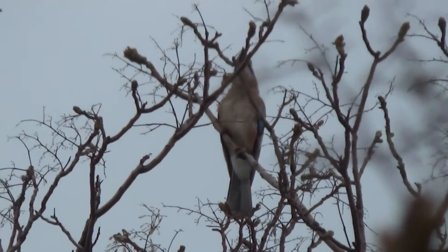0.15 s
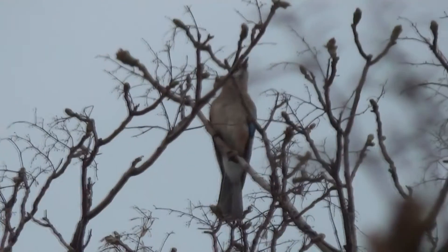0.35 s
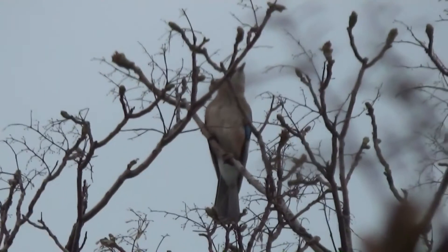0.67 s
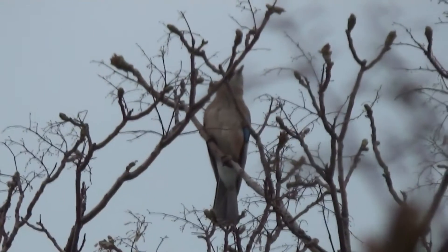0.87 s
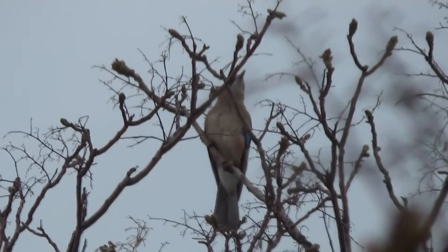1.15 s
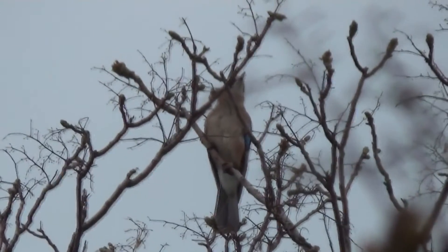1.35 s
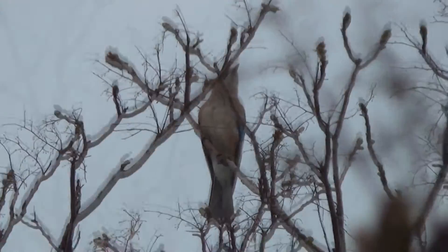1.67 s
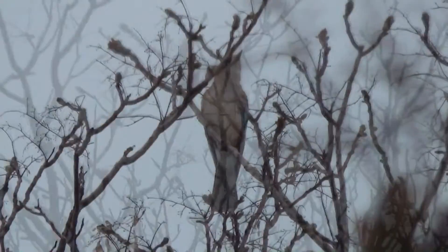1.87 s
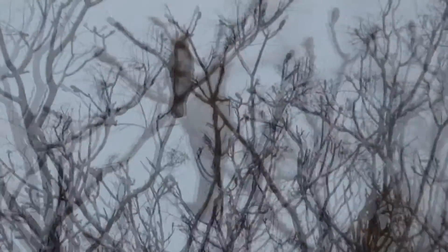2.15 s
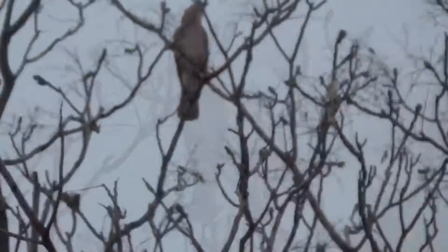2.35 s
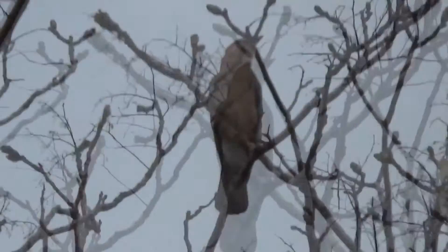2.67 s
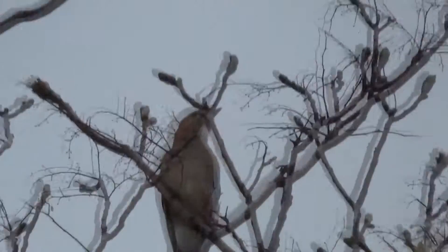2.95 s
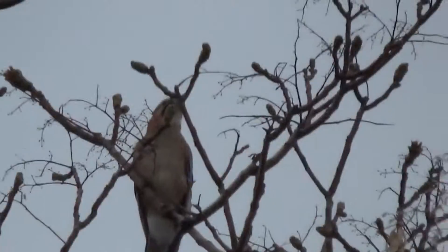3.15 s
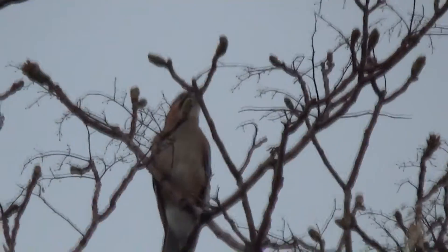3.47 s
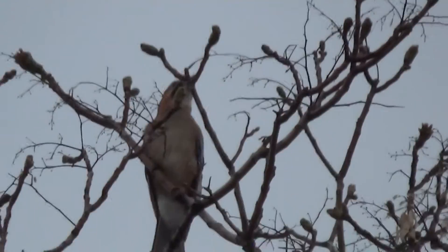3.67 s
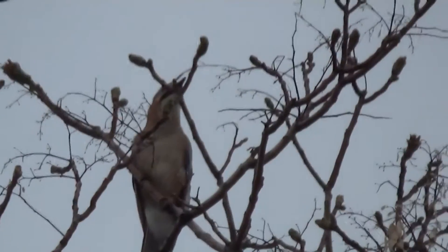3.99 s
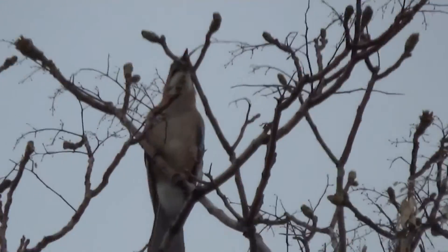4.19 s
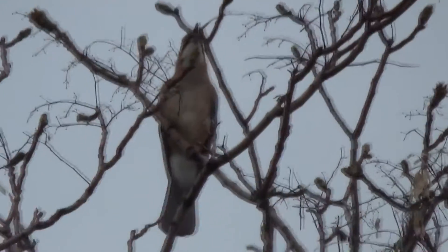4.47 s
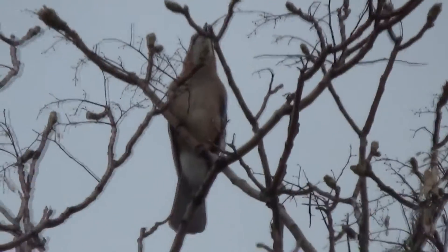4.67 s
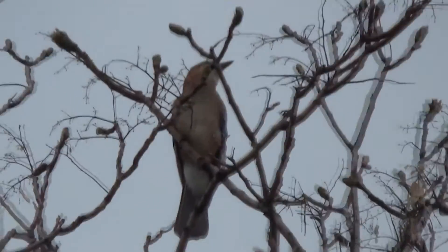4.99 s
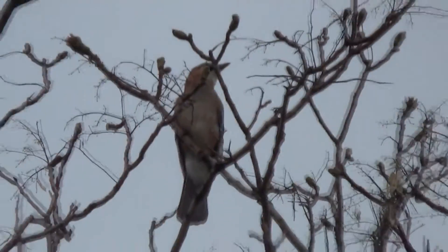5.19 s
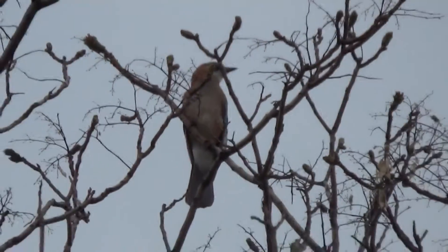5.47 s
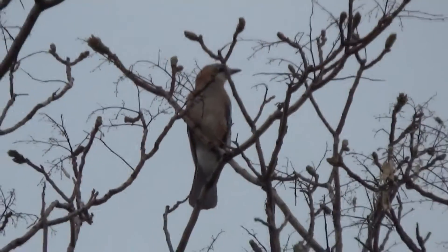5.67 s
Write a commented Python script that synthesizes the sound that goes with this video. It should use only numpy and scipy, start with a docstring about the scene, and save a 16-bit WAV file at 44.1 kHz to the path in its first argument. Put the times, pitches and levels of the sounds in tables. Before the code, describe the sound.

A jay's harsh screech is cut off, a car rolls away, small clicks follow, then a short rasp and another long raucous screech outdoors.

```python
"""Jay in a bare treetop

A jay screeches: the end of one call, then a short rasp and a long screech; each is pulses and puffs of
a fluttering syrinx, rung by throat resonances and echoed by trees. A car rolls away on a near road and
far traffic hums, both as shaped noise, the traffic with wavering tones. The camera ticks in the hands:
noise bursts ring its shell. Small birds chirp far off as gliding, warbling sines.
"""
import sys
import numpy as np
from scipy import signal
from scipy.fft import rfft, irfft
from scipy.io import wavfile
from scipy.ndimage import uniform_filter1d

SR = 44100
rng = np.random.default_rng(int(sys.argv[2]) if len(sys.argv) > 2 else 0)


def unload_audio(sound):
    """Save the sound as a 16-bit wav file, at the path given as the first command line argument."""
    columns = np.transpose(np.atleast_2d(sound))
    # keep every value between -1 and 1, then stretch to whole-number steps
    steps = np.round(np.clip(columns, -1, 1) * 32767)
    wavfile.write(sys.argv[1], SR, steps.astype(np.int16))


N = 257544
FFT_SIZE, HOP = 1024, 256
BIN_HZ = np.fft.rfftfreq(FFT_SIZE, 1 / SR)[:, None]
FRAME_S = np.arange(N // HOP + 5) * HOP / SR


def gain_of(db):
    """Decibels to amplitude gain."""
    return 10 ** (np.asarray(db) / 20)


def evened(x):
    """Scales to rms 1."""
    return x / np.sqrt(np.mean(x ** 2) + 1e-20)


def smooth_noise(count, size):
    """Slow random curve of rms 1: white noise under a moving average."""
    return evened(uniform_filter1d(rng.standard_normal(count), size=size))


def read(points, hz):
    """Spectrum table interpolated over log frequency."""
    table_hz, value = np.transpose(points)
    return np.interp(np.log(hz + 1), np.log(table_hz + 1), value)


def add(mix, start_s, sound):
    """Mixes a sound in at its start time."""
    part = mix[round(start_s * SR):][:len(sound)]
    part += sound[:len(part)]


def resonate(x, hz, width_hz):
    """Steep resonance of gain 1: shifts the curve hz to zero, smooths twice, shifts back."""
    turn = np.exp(2j * np.pi * np.cumsum(hz * np.ones(len(x))) / SR)
    r = np.exp(-np.pi * width_hz / SR)
    smoothed = signal.lfilter([(1 - r) ** 2], [1, -2 * r, r * r], x / turn)
    return 2 * (turn * smoothed).real


def unit(colour_db):
    """Shifts each spectrum so that its total power is 0 dB."""
    return colour_db - 10 * np.log10((gain_of(colour_db) ** 2).sum(0))


def above(corner_hz):
    """Treble weight: 0 below the corner, 1 from about an octave above."""
    return np.clip(np.log2(BIN_HZ / corner_hz + .01), 0, 1)


# background width: (frequency [Hz], side minus mid [dB])
SIDE_DB = [(60, -20), (240, -32.5), (950, -34.5), (3770, -33), (15000, -32)]


def hiss(field_db, patchy_db):
    """Near-mono noise from a frequency x time level field, with random patches."""
    mid_a, mid_b, side_a, side_b, patches = rng.standard_normal((5, *field_db.shape))
    patches = evened(uniform_filter1d(uniform_filter1d(patches, 10, 0), 12, 1))
    mid = mid_a + 1j * mid_b
    side = (side_a + 1j * side_b) * gain_of(read(SIDE_DB, BIN_HZ))
    z = np.array([mid + side, mid - side]) * gain_of(field_db + patchy_db * patches)
    return signal.istft(z, nperseg=FFT_SIZE, noverlap=FFT_SIZE - HOP)[1][:, :N] / np.sqrt(8 / 3)  # window loss


def waver(hz, share):
    """Tone of rms near 1 whose pitch and level drift a little."""
    pitch = smooth_noise(N, 6000)
    level = smooth_noise(N, 6000)
    tone = np.sin(2 * np.pi * np.cumsum(hz * (1 + share * pitch)) / SR)
    return np.sqrt(2) * (1 + .25 * level) * tone


RISE_DB, RISE_S, CUT_DB, CUT_S = -60, .028, -40, .019  # onset and cut-off: depths, time constants
PITCH_SHARE_PER_DB, ROUGH_PER_DB = .003, .025  # a weaker push is lower and rougher
BEAK_CLOSE_S = .12


def shape(start_s, end_s, top_db, fade_db, top_hz, droop, rough, gape):
    """Effort swells, sags and is cut off; pitch and roughness follow it while the beak settles from its gape."""
    t = np.arange(max(start_s, 0), end_s, 1 / SR)
    u = (t - start_s) / (end_s - start_s)
    push_db = RISE_DB * np.exp((start_s - t) / RISE_S) + CUT_DB * np.exp((t - end_s) / CUT_S)
    sag_db = fade_db * u ** 2
    hz = top_hz * (1 + PITCH_SHARE_PER_DB * push_db - droop * u ** 3)
    beak = 1 + gape * np.exp((start_s - t) / BEAK_CLOSE_S)
    return t, top_db + sag_db + push_db, hz, rough - ROUGH_PER_DB * (push_db + sag_db), beak


def flutter_beat(t, first_s, rate_start_hz, rate_end_hz):
    """Phase 0-1 of the syrinx flutter, its rate sweeping over the call."""
    since = t - first_s
    sweep = (rate_end_hz - rate_start_hz) * since / (2 * (t[-1] - first_s))
    return (since * (rate_start_hz + sweep)) % 1


THIN_BELOW_HZ, THINNING = 1500, .8  # low resonances lose THINNING dB more per dB of weaker push


def call(row, throat, flutter):
    """Membrane pulses and turbulent puffs, shaken by a flutter, ring the throat."""
    t, effort_db, hz, rough, beak = shape(*row)
    first_s, rate_start_hz, rate_end_hz, drop, dip_db = flutter
    beat = flutter_beat(t, first_s, rate_start_hz, rate_end_hz)
    depth = 1 + .3 * smooth_noise(len(t), 900)  # uneven beats
    slide = depth * uniform_filter1d(.5 - beat, size=250)  # pitch slides down, snaps back
    jitter = .028 * smooth_noise(len(t), 150)
    turns = np.cumsum(hz * (1 + drop * slide + jitter)) / SR

    spread = rng.normal(0, .2, 70)  # uneven closing spreads each pulse in time
    harmonics = range(2, int(15000 / hz.max()))
    pulses = evened(sum(np.cos(2 * np.pi * (k * turns + spread[k])) for k in harmonics))
    puffs = evened((.5 + np.exp(-(turns % 1) / .35)) * rng.standard_normal(len(t)))
    dip = gain_of(-dip_db * np.cos(np.pi * beat) ** 4 * depth)  # weakest at the snap
    thin_db = THINNING * (effort_db - effort_db.max())

    sound = 0
    for k, (f, width_hz, db) in enumerate(throat):
        noisy = np.clip(rough, .01, 1) ** (min(f + 2000, 3300) / f)  # lows stay clear, highs turn to noise
        source = (1 - noisy) * pulses + noisy * puffs
        drive = source * dip ** min(1, (1200 / f) ** 2)  # the low end throbs most
        ring = resonate(drive, f * beak, width_hz)
        sound = sound + (-1) ** k * gain_of(db + thin_db * (f < THIN_BELOW_HZ)) * ring
    return t[0], gain_of(effort_db) * evened(sound)


# calls: (start [s], end [s], effort [dB], fade over call [dB], pitch before sag [Hz], pitch droop [share],
#         roughness before sag [0-1], early gape [share])
JAY_CALLS = [(-.13, .287, -17, -12, 481, .03, .55, .03), (3.65, 3.853, -25.5, -5, 235, .1, .6, .01),
             (3.943, 4.362, -17.5, -6, 460, .12, .52, .12)]
# throat and beak resonances: (centre [Hz], width [Hz], level [dB])
FIRST_THROAT = [(950, 300, -27.5), (1325, 350, -13.5), (1966, 630, -8.5), (2395, 340, 3), (2870, 225, -6),
                (3340, 380, -12.5), (4450, 970, -10), (5490, 480, -2.5), (6080, 670, -4),
                (6760, 1700, -13.5), (9100, 1700, -16), (11100, 1400, -21.5), (13800, 3000, -32.5)]
RASP_THROAT = [(1480, 550, -13.5), (2655, 620, 0), (3470, 150, -8), (4020, 500, -1.5), (6130, 1400, -1.5),
               (7770, 1000, -17), (9440, 970, -5), (10870, 900, -17.5), (12300, 1100, -15)]
LONG_THROAT = [(860, 400, -29.5), (1330, 600, -16), (1857, 514, -2), (2295, 593, 1.5), (3015, 140, -9),
               (3480, 73, -14.5), (4560, 1870, -8), (5770, 890, -0.5), (7370, 3000, -15.5),
               (9900, 2100, -14.5), (11170, 1000, -20), (13500, 2600, -28)]
# syrinx flutter: (first beat [s], start rate [Hz], end rate [Hz], mean pitch drop [share], mean bass dip [dB])
FIRST_FLUTTER = (-.003, 33.5, 33., .1, 11.)
RASP_FLUTTER = (3.65, 30., 30., .02, 1.5)
LONG_FLUTTER = (3.966, 35.5, 23.5, .15, 16.)


def jay():
    """Three calls, each with its own throat and flutter."""
    out = np.zeros(N)
    throats = FIRST_THROAT, RASP_THROAT, LONG_THROAT
    flutters = FIRST_FLUTTER, RASP_FLUTTER, LONG_FLUTTER
    for row, throat, flutter in zip(JAY_CALLS, throats, flutters):
        add(out, *call(row, throat, flutter))
    return out


# stereo lean of the jay: (frequency [Hz], left minus right [dB])
JAY_SIDE = [(600, -.6), (1300, -.3), (2400, -1.2), (4400, .7), (8000, .2), (12000, 0)]


def leaned(x):
    """Direct sound at two ports, their balance set by frequency."""
    half_db = read(JAY_SIDE, np.fft.rfftfreq(N, 1 / SR)) / 2
    return irfft(rfft(x) * gain_of([half_db, -half_db]), N)


# tree echoes: (frequency [Hz], time to fall 60 dB [s])
TREES = [(700, .4), (2300, 0.58), (4200, 0.6), (5200, 0.74), (6600, .5), (14000, 0.19)]


def trees(x):
    """Scattered echoes off trunks and ground, each band dying at its own speed."""
    taps = np.zeros((2, SR))
    at = np.arange(400, SR - 20, 20) + rng.integers(0, 20, (2, (SR - 401) // 20))
    np.put_along_axis(taps, at, rng.choice([-1., 1.], at.shape), 1)
    hz, t, z = signal.stft(taps, SR, nperseg=256)
    decay = gain_of(-60 * t / read(TREES, hz)[:, None])
    mid, side = signal.istft(z * decay, SR, nperseg=256)[1]
    tail = np.array([mid + .08 * side, mid - .08 * side]) / np.linalg.norm(mid)
    return signal.fftconvolve(x[None], tail, axes=1)[:, :N]


# car level before treble lift: (time [s], level [dB])
CAR = [(0, -37.5), (.3, -36), (.62, -32), (.95, -35.5), (1.75, -41), (2.0, -44), (2.25, -51.5), (2.45, -75)]
# car colour near and far, relative: (frequency [Hz], density [dB per Hz])
CAR_NEAR = [(24, -57.5), (40, -33.5), (158, -15), (301, -7), (333, -9.5), (427, -11.5), (881, -1.5),
            (1410, -14.5), (2390, -24), (3650, -43.5), (4240, -35), (6160, -33), (15500, -53)]
CAR_AWAY = [(30, -40), (80, -16.5), (170, 2.5), (301, -0.5), (427, -9.5), (949, -1.5), (2510, -14),
            (3400, -20.5), (4600, -28), (6010, -26), (15500, -42.5)]
PASS_S, GONE_S = .5, .85  # moment of passing, time until it sounds far
BRIGHTEN_S, BRIGHTEN_DB_PER_S = 1.25, 9.5  # from here the treble above 2.5 kHz lifts steadily: start [s], lift [dB per s]


def car():
    """Tyre roar and engine as noise; the colour turns as the car draws away."""
    level_s, level_db = np.transpose(CAR)
    away = np.tanh(abs(FRAME_S - PASS_S) / GONE_S * 1.3) ** 1.5
    colour_db = (1 - away) * read(CAR_NEAR, BIN_HZ) + away * read(CAR_AWAY, BIN_HZ)
    treble_db = BRIGHTEN_DB_PER_S * np.maximum(FRAME_S - BRIGHTEN_S, 0) * above(2500)
    fade_db = -200 * np.maximum(FRAME_S - level_s[-1], 0)  # gone after the last point
    field_db = unit(colour_db) + np.interp(FRAME_S, level_s, level_db) + treble_db + fade_db
    return hiss(field_db, patchy_db=.8)


# far traffic: (time [s], gain of each deep layer [dB], treble lift [dB])
HAZE = [(2.2, -76, -1.5), (2.7, -81, 0), (3.7, -75, 0), (4.6, -67, 2.5), (5.1, -68.5, 3), (5.84, -70, 0.5)]
# traffic colour, relative: (frequency [Hz], density [dB per Hz])
HAZE_COLOUR = [(60, -37.5), (110, -14), (190, -7.5), (300, -1.5), (420, -9.5), (620, -13.5), (900, -12),
               (1150, -16), (1700, -13), (2800, -23), (4750, -29), (6200, -27.5), (15500, -34.5)]
# narrow hums: (centre [Hz], level [dB], width [Hz])
HUMS = [(470, -73, 25), (7827, -83, 120), (14002, -89, 100)]
HAZE_DB = -51.4  # wash before treble lift
DRONE_START_S, DRONE_END_S, DRONE_HZ, DRONE_DB = 2.0, 3.9, 178, -66


def haze():
    """Far traffic wash, an idling engine's rumble, a swelling drone and faint narrow hums."""
    point_s, *columns = np.transpose(HAZE)
    deep_db, treble_db = (np.interp(FRAME_S, point_s, c) for c in columns)
    wash_db = unit(read(HAZE_COLOUR, BIN_HZ)) + HAZE_DB + treble_db * above(700)
    rumble = waver(53, 0.039) + 0.91 * evened(resonate(rng.standard_normal(N), 70, 60))
    rumble *= gain_of(np.interp(np.arange(N) / SR, FRAME_S, deep_db))
    tones = sum(gain_of(db) * evened(resonate(rng.standard_normal(N), hz, width)) for hz, db, width in HUMS)
    swell = signal.windows.tukey(int((DRONE_END_S - DRONE_START_S) * SR), .5)
    drone = gain_of(DRONE_DB) * swell * waver(DRONE_HZ, 0.0194)[:len(swell)]
    add(tones, DRONE_START_S, drone)
    return hiss(wash_db, patchy_db=1.46) + rumble * gain_of([[-.8], [.8]]) + tones


# ticks: (time [s], snap peak [dB], knock peak re snap [dB], length [ms], snap centre [Hz])
TICKS = [(1.6612, -41.5, -1, 5, 6500), (1.8278, -37.5, -11, 3.5, 8000), (1.848, -45, 8, 6, 9500),
         (1.877, -41, 6.5, 4.4, 5800), (1.8811, -38.5, 4.5, 7, 7500), (1.902, -42, 4, 7.2, 8000),
         (1.911, -45, -8, 6.7, 7500), (1.9659, -43, 2, 4, 3300), (2.181, -43, -7, 4, 10600),
         (2.2184, -46, -12, 5, 7000), (2.2277, -42.5, -14, 3.7, 9000), (2.2468, -47, -10, 5.5, 9500),
         (2.5226, -36, 3, 10, 5200), (2.6803, -50.5, -5, 4, 5800), (5.3018, -45.5, -3, 4, 5800),
         (5.7135, -46.5, 7, 12.6, 6200)]
# camera shell, first two rows knock, rest snap: (centre [Hz], width [Hz], level [dB])
SHELL = [(1000, 450, 8), (1850, 1300, 8.5), (3300, 2400, -3), (5770, 1800, 8), (7730, 3300, 0.5),
         (10400, 4600, -5.5)]


def ticks():
    """Short noise bursts ring the camera shell: a low knock and a bright snap."""
    out, t = np.zeros(N), np.arange(1500) / SR
    bursts = rng.standard_normal((len(TICKS), len(t)))
    for (start_s, db, knock_db, ms, snap_hz), burst in zip(TICKS, bursts):
        burst = burst * np.sqrt(t) * np.exp(-t * 4000 / ms)
        rings = [gain_of(d) * resonate(burst, hz, w) for hz, w, d in SHELL]
        favour = [gain_of(-14 * abs(np.log2(hz / snap_hz))) for hz, w, d in SHELL]  # where the finger lands
        knock = sum(rings[:2])
        snap = np.dot(favour[2:], rings[2:]) * np.exp(-t * 1500 / ms)  # dies first
        tick = snap / abs(snap).max() + gain_of(knock_db) * knock / abs(knock).max()
        add(out, start_s, gain_of(db) * tick)
    return out


# far birds' notes: (length [s], start [Hz], end [Hz], warble rms [Hz])
RISER = (.055, 4200, 5350, 180)
PIP = (.024, 4260, 4120, 25)
FALLER = (.052, 4800, 4260, 40)
DROP = (.03, 3900, 3400, 40)
LIFT = (.065, 3500, 3760, 15)
FUZZ = (.07, 5300, 5050, 200)
LOW_FALL = (.055, 4350, 3800, 60)
HIGH_PIP = (.035, 4400, 4340, 30)
HELD = (.13, 3780, 3760, 30)
LINGER = (.9, 5400, 5080, 200)
# chirps: (time [s], note, level before fades [dB])
CHIRPS = [(1.666, LOW_FALL, -66), (2.068, RISER, -64), (2.185, RISER, -64), (2.303, RISER, -70),
          (2.378, RISER, -72), (2.913, PIP, -59), (2.94, PIP, -70), (2.985, PIP, -71), (3.015, PIP, -71),
          (3.288, PIP, -63), (3.356, PIP, -68), (3.386, PIP, -71), (3.43, DROP, -74), (4.45, LINGER, -73),
          (4.628, LIFT, -62), (4.72, FUZZ, -71), (4.77, FALLER, -65), (4.83, FUZZ, -70),
          (4.932, HIGH_PIP, -63), (4.935, FUZZ, -67), (4.95, LIFT, -61), (5.07, FUZZ, -65),
          (5.095, FALLER, -68), (5.55, HELD, -73), (5.648, HIGH_PIP, -72), (5.76, HIGH_PIP, -73),
          (5.803, PIP, -70)]
GLIDE_BEND_RAD = 1.1  # glides slow towards their end


def songbirds():
    """Gliding whistles, blurred by random warble; the longest is a faint fuzzy band outlasting the long screech."""
    out = np.zeros(N)
    for start_s, (length_s, hz0, hz1, warble_hz), db in CHIRPS:
        u = np.linspace(0, 1, int(length_s * SR))
        warble = warble_hz * smooth_noise(SR, 100)[:len(u)]
        glide = np.sin(GLIDE_BEND_RAD * u) / np.sin(GLIDE_BEND_RAD)
        tone = np.sin(2 * np.pi * np.cumsum(hz0 + (hz1 - hz0) * glide + warble) / SR)
        add(out, start_s, gain_of(db) * np.sqrt(2) * tone * signal.windows.tukey(len(u), .5))
    return out


JAY_ECHO_DB, BIRD_ECHO_GAIN = -17, .26


def scene():
    """All sources at the two microphone ports."""
    calls = jay()
    birds = songbirds()
    echoes = trees(gain_of(JAY_ECHO_DB) * calls + BIRD_ECHO_GAIN * birds)
    return leaned(calls) + echoes + birds + ticks() + car() + haze()


def record(dry):
    """The microphone drops the deepest bass; then the band limit."""
    dry = signal.sosfilt(signal.butter(2, 42, "high", fs=SR, output="sos"), dry)
    band = signal.firwin(511, 15650, window=("kaiser", 9), fs=SR)  # lowpass edge, Hz
    return signal.oaconvolve(dry, band[None], "same")


dry = scene()
out = record(dry)
unload_audio(out)
```